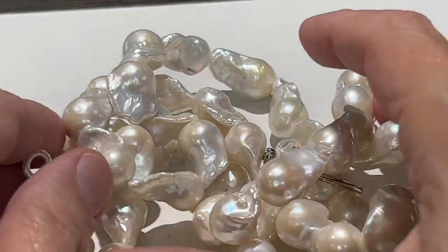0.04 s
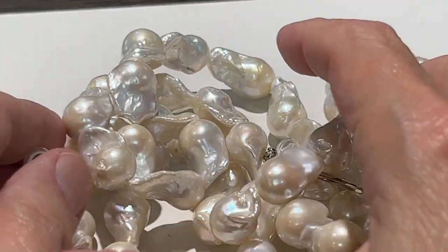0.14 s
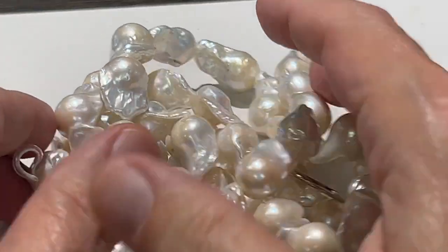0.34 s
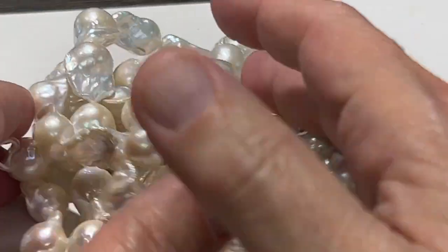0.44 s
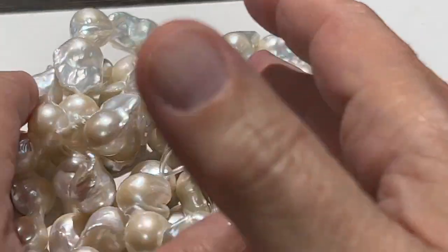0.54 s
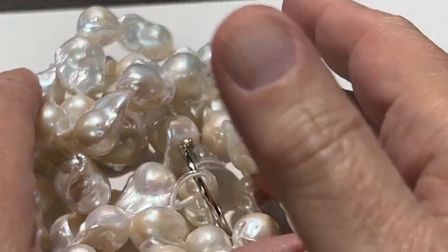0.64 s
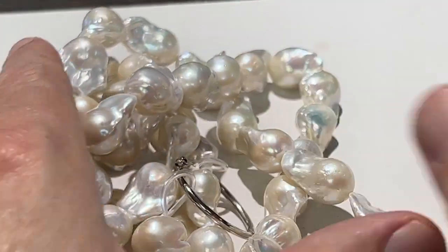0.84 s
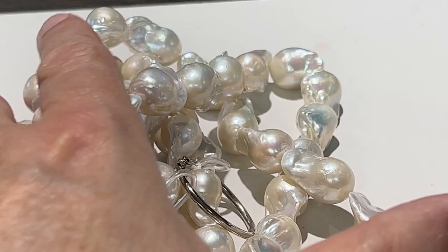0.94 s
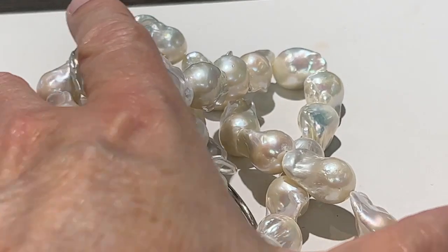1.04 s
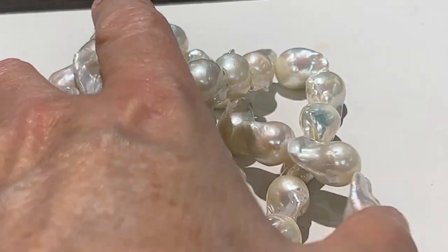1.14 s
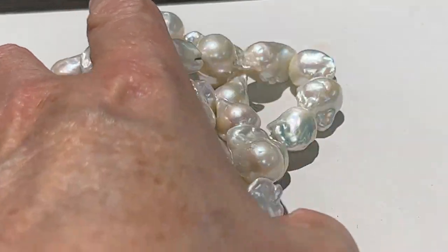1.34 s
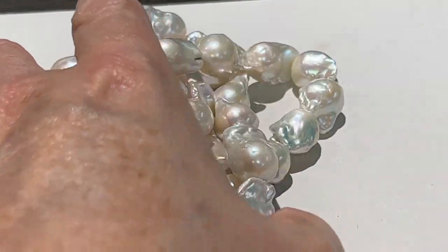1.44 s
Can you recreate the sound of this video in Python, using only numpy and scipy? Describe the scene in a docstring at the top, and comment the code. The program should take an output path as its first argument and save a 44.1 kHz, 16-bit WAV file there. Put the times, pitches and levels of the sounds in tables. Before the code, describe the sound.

Pearl strands clicking together and knocking dully on a table top, very close, over low room hum

```python
"""Pearl strands on a table

Hands turn strands of large pearls on a table top, right in front of a close two-port microphone.
Pearls click together (an impact, a noisy crack, ringing sines) and knock on the table, whose
damped resonances answer dully. Dragged strands rustle and scratch as noise shaped from tiny slips.
Behind them the room hums low: two wavering tones, rumble and a faint airy noise."""
import sys
import numpy as np
from scipy import signal
from scipy.fft import rfft, irfft, next_fast_len
from scipy.io import wavfile
from scipy.ndimage import map_coordinates

SR = 44100
rng = np.random.default_rng(int(sys.argv[2]) if len(sys.argv) > 2 else 0)


def master(y):
    """Save y as 16-bit WAV."""
    cut = np.clip(np.atleast_2d(y).T, -1, 1)
    pcm = np.round(cut * 32767)  # scale
    wavfile.write(sys.argv[1], SR, pcm.astype(np.int16))


N = 66150  # samples: 1.5 s
TOP_HZ = 16600  # upper band limit of the microphone


def amp(db):
    """Amplitude factor of a level in dB."""
    return 10 ** (np.asarray(db) / 20)


def unit(x):
    """x at rms 1."""
    return x / np.sqrt(np.mean(x ** 2) + 1e-20)


def along(points, hz):
    """Interpolate (Hz, value) points on a log frequency axis."""
    f, v = np.transpose(points)
    return np.interp(np.log(hz + 1), np.log(f + 1), v)


def curves(rows):
    """One value per sample for each column after the time."""
    s, *columns = np.transpose(rows)
    return [np.interp(np.arange(N) / SR, s, column) for column in columns]


def filtered(x, response):
    """x times a complex response of frequency."""
    n = x.shape[-1]
    padded = next_fast_len(n + 4096)
    spectrum = rfft(x, padded) * response(np.fft.rfftfreq(padded, 1 / SR))
    return irfft(spectrum, padded)[..., :n]


def coloured(x, spectrum):
    """x filtered by (Hz, dB) points, then brought to rms 1."""
    return unit(filtered(x, lambda hz: amp(along(spectrum, hz))))


def wobble(rate):
    """A smooth random curve, rate knots a second."""
    knots = rng.standard_normal(int(N * rate / SR) + 4)
    return map_coordinates(knots, [np.arange(N) * rate / SR])


def burst(t60, size=4096):
    """Noise of energy 1 that dies by 60 dB in t60 seconds."""
    x = rng.standard_normal(size) * amp(-60 * np.arange(size) / SR / t60)
    return x / np.linalg.norm(x)


def grains(rate, spread_db):
    """Many tiny slips of uneven size and random sign, on average rate a second."""
    slips = rng.random(N) < rate / SR
    excess = np.minimum(rng.exponential(size=N), 2)
    sizes = amp(spread_db * excess) * rng.choice([-1, 1], N)
    return slips * sizes


def add(track, s, sound):
    """Mix a sound in at time s."""
    i = max(round(s * SR), 0)
    track[..., i:i + sound.shape[-1]] += sound[..., :max(N - i, 0)]


# Low noise of the room. Each row: frequency in Hz, relative density in dB per Hz.
RUMBLE_SPECTRUM = [(20, -40), (36, -17), (52, -0.5), (80, -2), (110, -10), (170, -16), (260, -23),
                   (600, -55)]


def rumble(level_db=-48):
    """Steady noise, strongest in the deep bass."""
    return amp(level_db) * coloured(rng.standard_normal(N), RUMBLE_SPECTRUM)


# Airy noise of the room. Each row: frequency in Hz, relative density in dB per Hz.
AIR_SPECTRUM = [(100, 5.5), (300, 7.5), (900, -11), (2000, -12.5), (5000, -21.5), (15500, -19),
                (16600, -57)]


def air(level_db=-65):
    """Faint steady noise that reaches up into the treble."""
    return amp(level_db) * coloured(rng.standard_normal(N), AIR_SPECTRUM)


# Two low room tones. Each row: time in seconds, mean level of the lower in dB, of the upper in dB.
DRONE = [(0, -48, -49.5), (.48, -40, -50), (.68, -44, -50.5), (.8, -62, -45), (1.05, -50.5, -63),
         (1.28, -49, -47.5), (1.4, -44.5, -44.5)]
# Their pitches: lower in Hz, upper in Hz.
DRONE_HZ = (53.9, 76.4)


def drone():
    """Two low sines, each wavering in level and phase."""
    t = np.arange(N) / SR
    out = np.zeros(N)
    for hz, db in zip(DRONE_HZ, curves(DRONE)):
        level = amp(db + wobble(11.5)) * np.sqrt(2)  # rms to peak
        out += level * np.sin(2 * np.pi * hz * t + 0.67 * wobble(6.28))
    return out


def room():
    """The background: two wavering tones, steady rumble and airy noise add up."""
    return drone() + rumble() + air()


# How strongly a strand is dragged, heard close by.
# Each row: time in seconds, level of the table's rustle in dB, scratching in dB before SCRATCH_DB.
DRAG = [(0, -44.5, -46), (.05, -66.5, -89.5), (.26, -58, -76), (0.329, -39.5, -55.5), (.355, -41.5, -57),
        (.41, -41.5, -56), (.47, -48, -54.5), (.53, -50, -52.5), (.57, -50, -70), (.74, -51, -58.5),
        (.87, -61, -72.5), (0.946, -55, -66.5), (1.09, -65, -79.5), (1.124, -44.5, -54.5),
        (1.149, -49, -70), (1.189, -40, -50.5), (1.25, -47, -55), (1.37, -58.5, -71), (1.5, -51, -58.5)]
# Rustle of the table top. Each row: frequency in Hz, relative density in dB per Hz.
RUSTLE_SPECTRUM = [(90, -3), (150, 3), (240, 0), (320, 1.5), (480, 0.5), (750, -3), (1000, -7),
                   (1500, -15.5), (2200, -26.5), (4000, -29.5)]
SLIPS_PER_S, SLIP_SPREAD_DB = 750, 1  # bumps of the strand on the table


def rustle():
    """A sliding strand bumps along and sounds in the table top."""
    bumps = grains(SLIPS_PER_S, SLIP_SPREAD_DB)
    return coloured(bumps, RUSTLE_SPECTRUM) * amp(curves(DRAG)[0])


# Scratching of pearl on pearl. Each row: frequency in Hz, relative density in dB per Hz.
SCRATCH_SPECTRUM = [(600, -1), (1500, 5.5), (2300, -7), (3300, 2.5), (6000, 0), (9000, -3.5), (12000, -3),
                    (15500, -16), (16600, -23)]
SCRATCH_DB = 1.5
GRAINS_PER_S, GRAIN_SPREAD_DB, GRAIN_T60 = 400, 6, 0.0028  # T60: seconds to fall by 60 dB


def scratch():
    """Sliding pearls scratch finely: each slip sets off a brief fading puff of noise."""
    fade = amp(-60 * np.arange(1024) / SR / GRAIN_T60)
    slips = grains(GRAINS_PER_S, GRAIN_SPREAD_DB)
    power = signal.fftconvolve(slips ** 2, fade ** 2)[:N]
    rough = np.sqrt(np.abs(power)) * rng.standard_normal(N)
    return coloured(rough, SCRATCH_SPECTRUM) * amp(SCRATCH_DB + curves(DRAG)[1])


# Resonances of the table top. Each row: frequency in Hz, width in Hz, level in dB.
TABLE_MODES = [(164.6, 20, -5), (321, 54, -1), (449, 160, -.5), (565, 58, -3), (920, 153, -4),
               (1236, 410, -8)]
BEND_S = 0.001857  # travel time of a 1 kHz bending wave, seconds


def table_top(hz):
    """Damped resonances; bending waves bring the treble a little before the bass."""
    modes = 0
    for centre, width, db in TABLE_MODES:
        damping = 1j * hz * width
        modes = modes + amp(db) * damping / (centre ** 2 - hz ** 2 + damping)
    return modes * np.exp(-4j * np.pi * BEND_S * np.sqrt(1000 * hz))


CONTACT_ORDER = 5.85  # steepness of the contact's treble cut-off
THIN_SHARE, THIN_ORDER = 0.23, 1.95  # bass is lost below this share of the cut-off; steepness


def contact(hz, cutoff_hz):
    """A soft, long contact lacks treble; a hard, light one lacks bass."""
    bass_loss = 1 - np.exp(-(hz / (THIN_SHARE * cutoff_hz)) ** THIN_ORDER)
    treble_loss = np.sqrt(1 + (hz / cutoff_hz) ** (2 * CONTACT_ORDER))
    return bass_loss / treble_loss


# Pearls and fingers set down on the table, close to the microphone.
# Each row: start in seconds, level in dB before the knocks' common gain, contact cut-off in Hz.
KNOCKS = [(0.066, -42, 1630), (0.1699, -38, 1580), (.118, -38, 392), (0.232, -32.5, 385), (.296, -33, 1430),
          (0.3067, -28.5, 800), (0.321, -29.5, 1290), (.329, -26.5, 950), (0.3867, -26.5, 670),
          (0.402, -25.5, 540), (.415, -30.5, 570), (.43, -32, 930), (0.538, -34.5, 950), (0.58, -34, 855),
          (0.6039, -20.5, 986), (0.673, -27.5, 1095), (0.693, -36, 610), (0.7072, -20, 506),
          (0.712, -16, 163), (0.761, -29.5, 795), (.7797, -9, 996), (0.7916, -11.5, 1010),
          (.813, -23.5, 620), (1.0112, -47.5, 2000), (1.106, -41.5, 1210), (1.155, -34.5, 1640),
          (1.165, -27, 444), (1.181, -43, 600), (1.197, -26, 684), (1.2195, -36.5, 1780),
          (1.4171, -32, 2930)]
TABLE_TAIL_DB, TABLE_T60, TAIL_HZ = -4, 0.05, 610  # T60 in seconds; treble cut of the tail


def knocks(gain_db=32):
    """A blow and its dulled noise tail, shaped by the contact, ring the table's resonances."""
    out = np.zeros(N)
    for s, db, cutoff_hz in KNOCKS:
        tail = filtered(burst(TABLE_T60), lambda hz: 1 / (1 + 1j * hz / TAIL_HZ))
        blow = amp(TABLE_TAIL_DB) * tail
        blow[0] += 1  # the impact itself
        knock = filtered(blow, lambda hz: table_top(hz) * contact(hz, cutoff_hz))
        add(out, s, amp(db + gain_db) * knock)
    return out


# Pearl against pearl, close to the microphone. Each row: start in seconds,
# crack at 4 kHz in dB and at 11 kHz in dB (both before CLICK_DB and colour), ring in Hz, ring in dB.
CLICKS = [(0.1015, -47.5, -42.5, 6310, -53), (0.1308, -44.5, -66, 4470, -57),
          (0.1712, -49.5, -49, 3860, -53.5), (0.2973, -34.5, -44.5, 3450, -56),
          (0.3057, -27.5, -32.5, 6140, -44), (0.3132, -40, -43, 3320, -39), (0.3217, -32, -25.5, 6470, -38),
          (0.3239, -27, -33, 8450, -38), (0.3286, -23, -25, 3430, -28), (0.364, -36, -40, 3500, -43),
          (0.3705, -39, -35, 6190, -43), (0.3895, -30, -28, 6100, -33), (0.396, -35, -31, 4100, -29.5),
          (0.402, -30, -25, 7270, -29), (0.4074, -35, -25.5, 7800, -49), (0.411, -28, -30.5, 3270, -28),
          (0.4269, -43, -42, 6160, -32), (0.431, -26.5, -23, 7890, -30), (0.4477, -34, -40, 3070, -41),
          (0.4626, -34.5, -19, 3250, -34), (0.4842, -36.5, -42, 6360, -39.5), (0.5076, -39, -42, 4060, -42),
          (0.5295, -40, -36.5, 12760, -37.5), (0.582, -37.5, -32.5, 4140, -34.5),
          (0.604, -30, -33, 5070, -38.5), (0.609, -29.5, -41, 4400, -47), (0.6623, -39.5, -36.5, 6550, -47),
          (0.6725, -53, -43, 4700, -41), (0.692, -33.5, -36, 3310, -41), (0.706, -38.5, -35, 11600, -29.5),
          (0.7602, -39.5, -38, 7160, -39), (0.929, -50, -44, 6590, -52), (0.95, -42.5, -44, 5350, -46),
          (1.1078, -47, -69, 5950, -48), (1.137, -39, -60, 2590, -36), (1.154, -27, -40, 4420, -35),
          (1.1651, -32, -31, 5940, -46), (1.177, -30, -34.5, 5860, -33), (1.1854, -30, -28, 5930, -32),
          (1.1977, -33, -25.5, 5150, -31), (1.2213, -33, -33.5, 5200, -37),
          (1.2455, -35.5, -35.5, 5030, -33.5), (1.2911, -33.5, -33.5, 5930, -30.5),
          (1.3391, -40, -36.5, 4280, -45.5), (1.4179, -29, -39, 2680, -30.5),
          (1.439, -28.5, -82, 2600, -50), (1.4613, -40, -76, 2800, -34), (1.4749, -21, -38.5, 3300, -38),
          (1.4879, -30.5, -43.5, 3040, -50)]
# Colour that all cracks share. Each row: frequency in Hz, gain in dB.
PEARL_COLOUR = [(200, -45), (900, -6), (2400, -3.5), (3300, 0), (11400, 3), (13600, -1.5), (15500, -11.5)]
# Uneven pearls: lowest and highest ratio of the second mode's frequency to the first's.
MODE_RATIO = (1.25, 2.17)
CLICK_DB, CLICK_RISE_S, CLICK_T60 = 16, 0.00034, 0.008  # times in seconds
CLICK_TAIL_DB, CLICK_TAIL_T60 = -21.5, 0.09  # faint tail from the strand
STRIKE = 0.29  # sharp impact, relative to the norm of the rattle around it
RING_T60, SECOND_MODE_DB = 0.011, -12.5  # ring's T60 in seconds; second mode against the first


def clicks():
    """Each contact is a sharp impact in a noisy crack, with two ringing modes and a faint tail."""
    out, t = np.zeros(N), np.arange(2048) / SR
    rise = 1 - np.exp(-t / CLICK_RISE_S)
    shape = rise * (amp(-60 * t / CLICK_T60) + amp(CLICK_TAIL_DB - 60 * t / CLICK_TAIL_T60))
    for s, low_db, top_db, ring_hz, ring_db in CLICKS:
        crack = shape * rng.choice([-1, 1], len(t))
        crack[np.argmax(shape)] = STRIKE * np.linalg.norm(crack)
        crack /= np.linalg.norm(crack)
        tilt = [(4000, low_db), (11000, top_db)]
        add(out, s, filtered(
            crack, lambda hz: amp(CLICK_DB + along(tilt, hz) + along(PEARL_COLOUR, hz))))

        turn = 2 * np.pi * ring_hz * t
        ratio = rng.uniform(*MODE_RATIO)
        ring = np.sin(turn)
        if ratio * ring_hz < TOP_HZ:
            ring += amp(SECOND_MODE_DB) * np.sin(ratio * turn)
        add(out, s, rise * amp(ring_db - 60 * t / RING_T60) * ring)
    return out


# Share of the pearls' sound that differs between the ports. Each row: frequency in Hz, level in dB.
APART = [(2000, -30), (6000, -11.5), (10000, -18.5), (13500, -21)]
TABLE_APART_DB = -18.5  # the same for the table's sound


def scene(rumble_apart_db=-15):
    """The sound is mostly alike at both ports; a weaker, independent part and a table echo differ."""
    table = knocks() + rustle()
    near = table + clicks() + scratch() + room()
    # fresh random draws and the echo, added with opposite sign at the two ports
    pearls_apart = filtered(clicks() + scratch(), lambda hz: 1j * amp(along(APART, hz)))
    table_echo = signal.fftconvolve(table, burst(t60=0.1))[:N]
    table_apart = amp(TABLE_APART_DB) * (rustle() + table_echo)
    apart = pearls_apart + table_apart + amp(rumble_apart_db) * rumble()
    return np.array([near + apart, near - apart])


# Two close microphone ports. Each row: frequency in Hz, phase lead of the left port in radians.
PORTS = [(20, 0), (2200, 0), (3300, .45), (5200, .15), (5900, -.3), (7000, -.1), (8200, -.8), (9400, -2.8),
         (10600, -3.4), (12400, -5.3), (16000, -8.4)]


def record(dry):
    """The two ports drift apart in phase in the treble, and the band ends at TOP_HZ."""
    sides = np.array([[1], [-1]])  # left leads by half the phase, right lags by half
    return filtered(dry, lambda hz: np.exp(0.5j * along(PORTS, hz) * sides) * (hz < TOP_HZ))


dry = scene()
out = record(dry)
master(out)
```